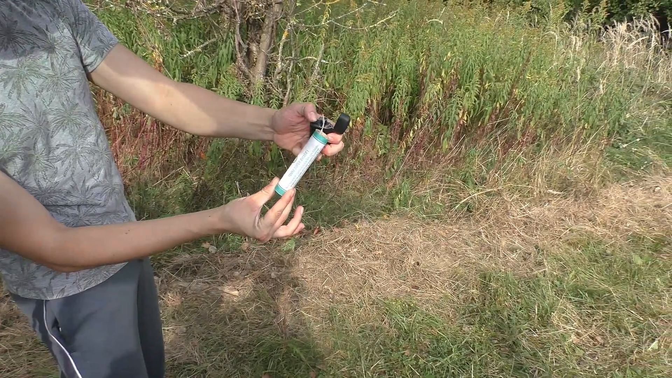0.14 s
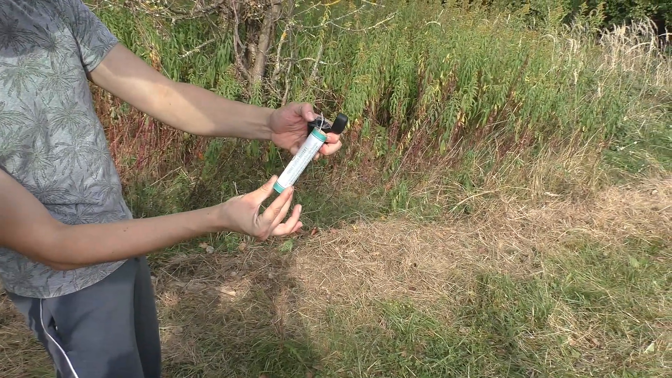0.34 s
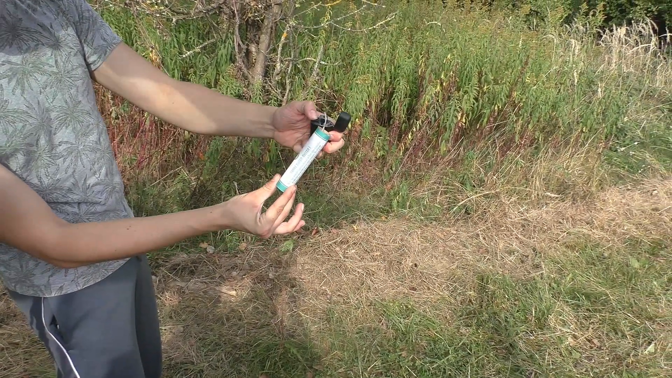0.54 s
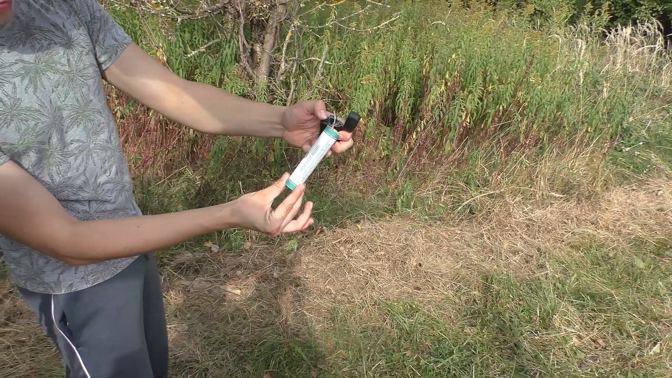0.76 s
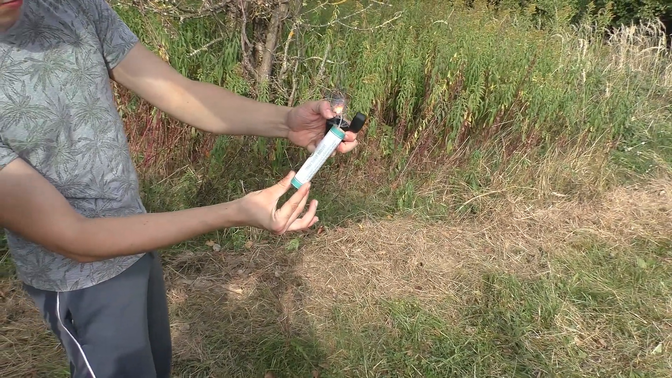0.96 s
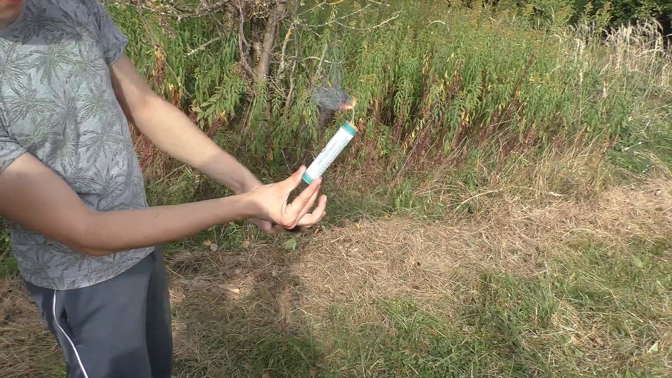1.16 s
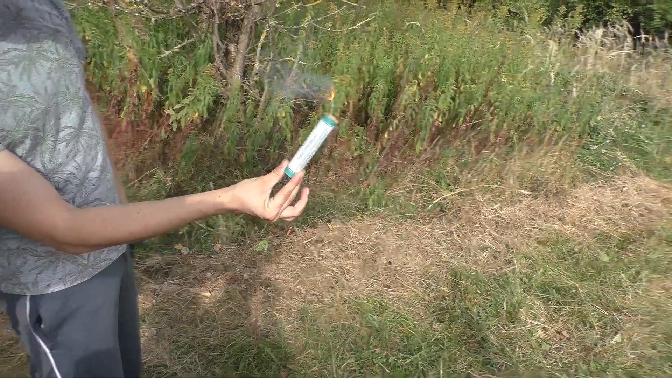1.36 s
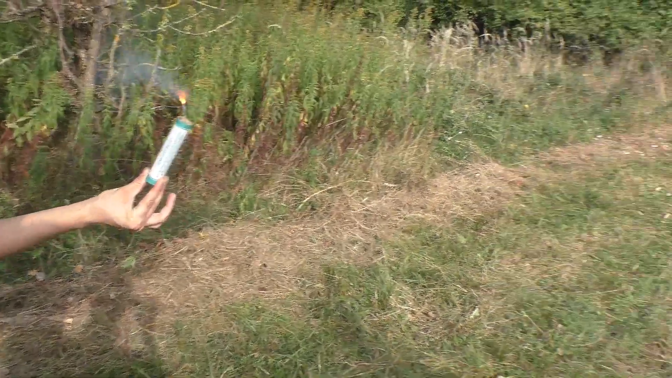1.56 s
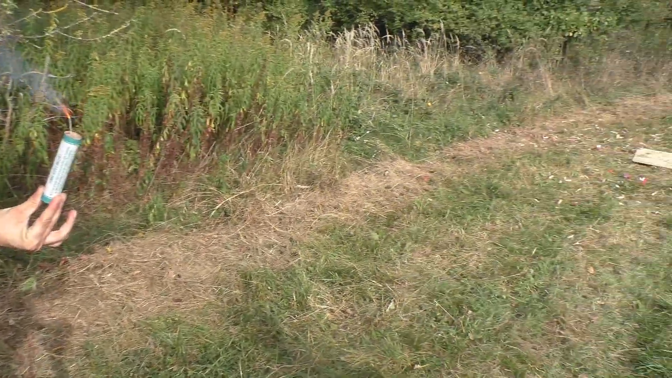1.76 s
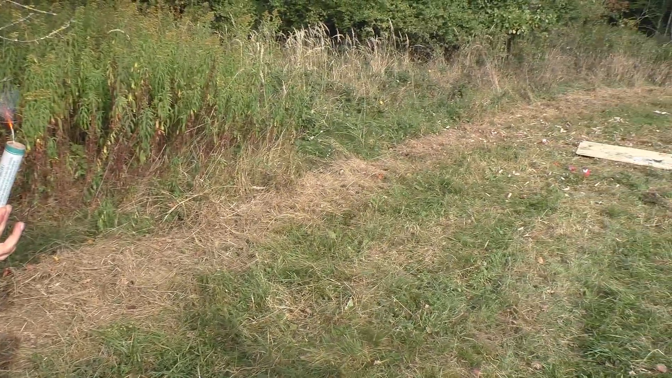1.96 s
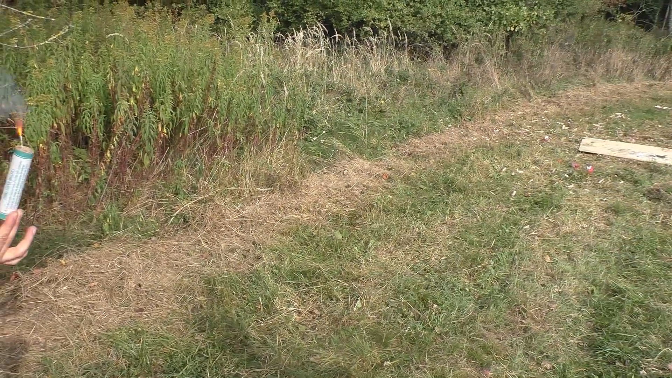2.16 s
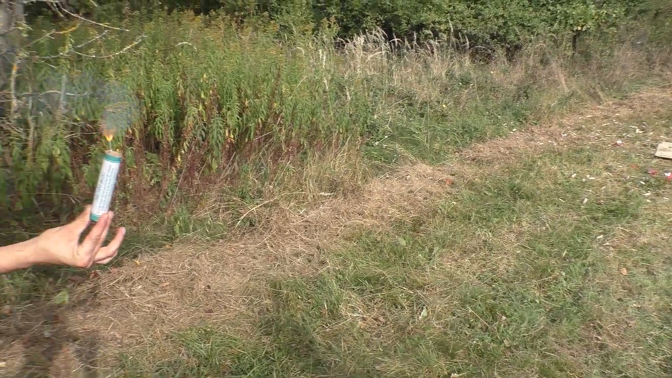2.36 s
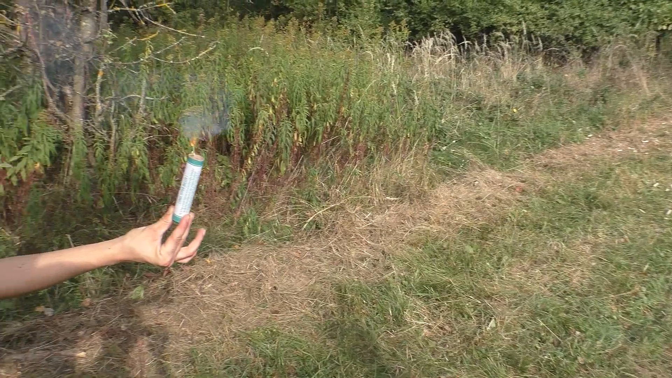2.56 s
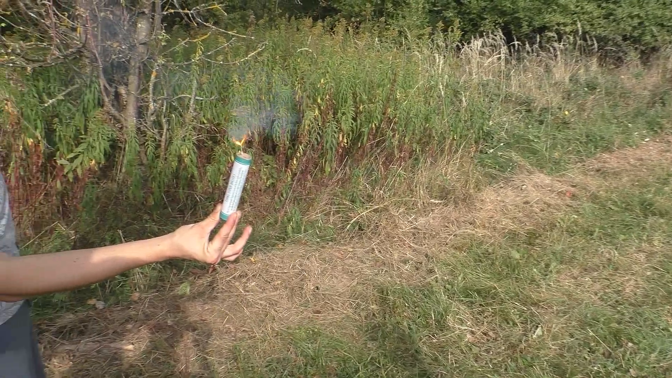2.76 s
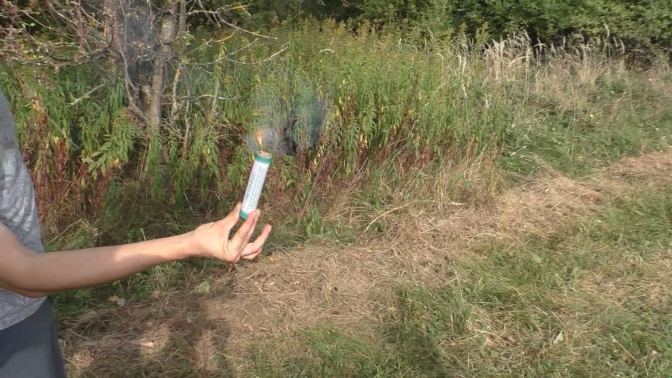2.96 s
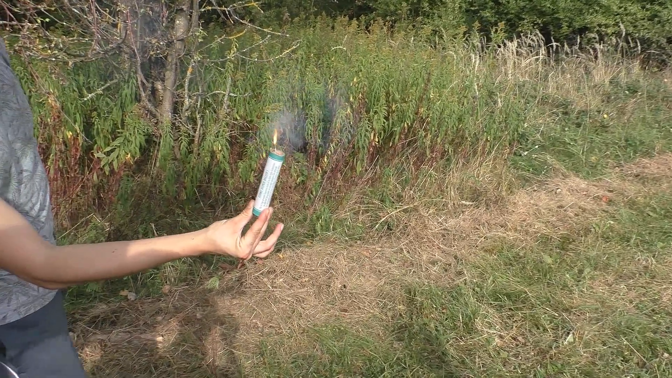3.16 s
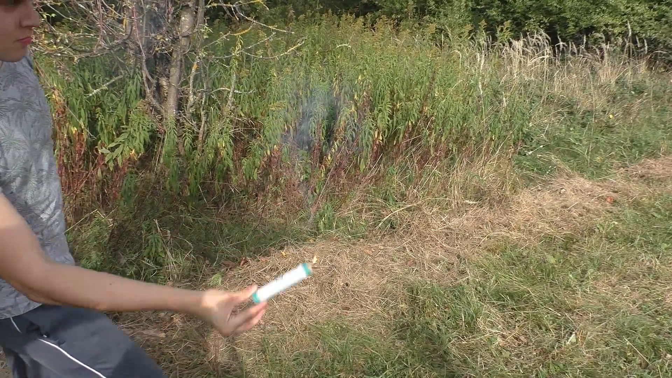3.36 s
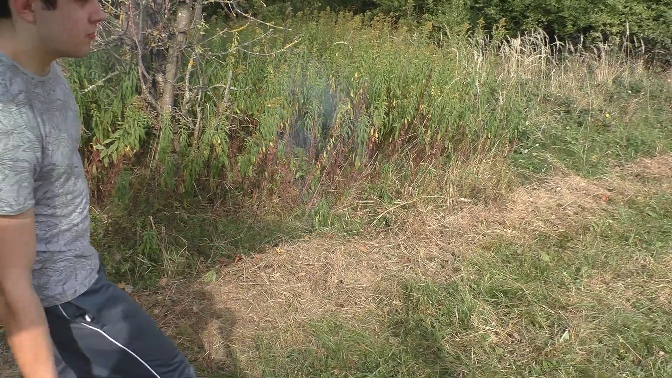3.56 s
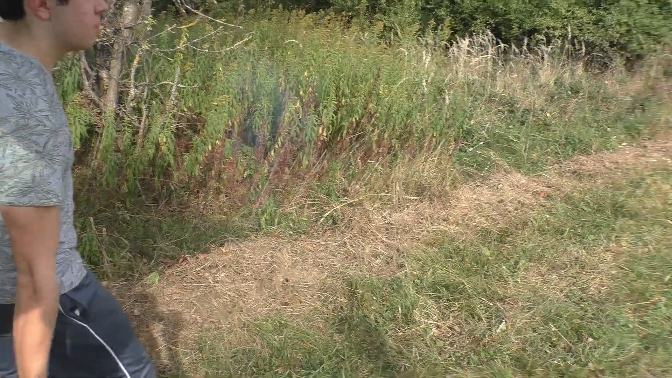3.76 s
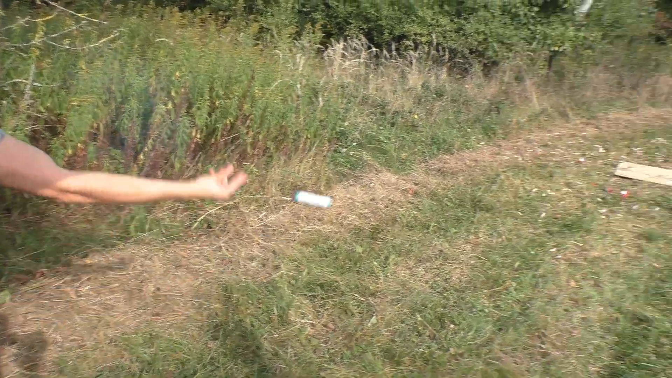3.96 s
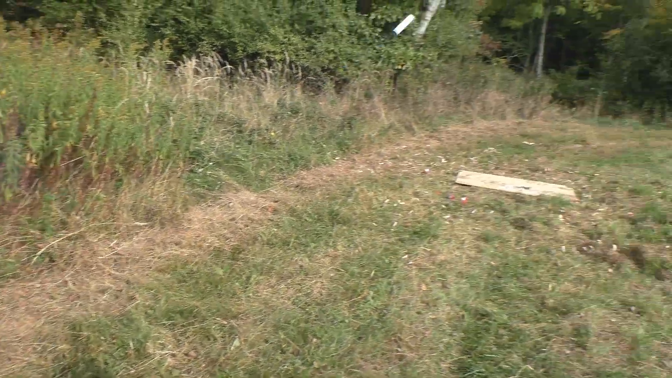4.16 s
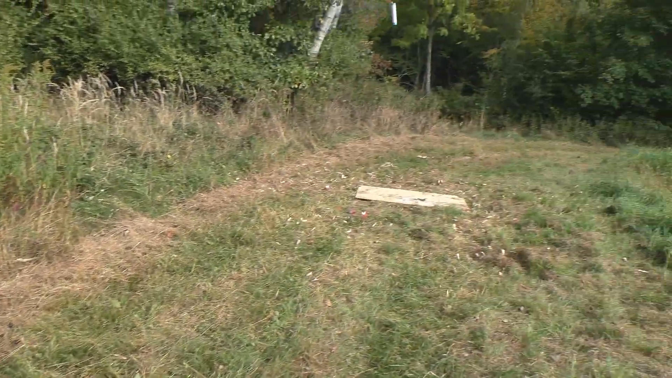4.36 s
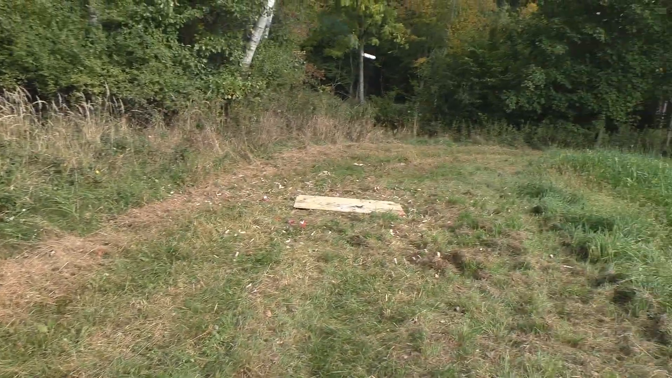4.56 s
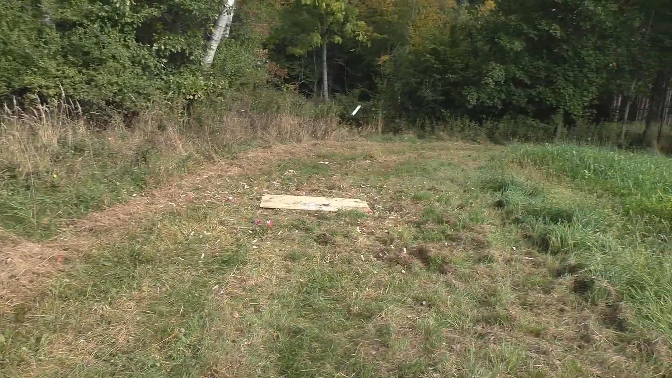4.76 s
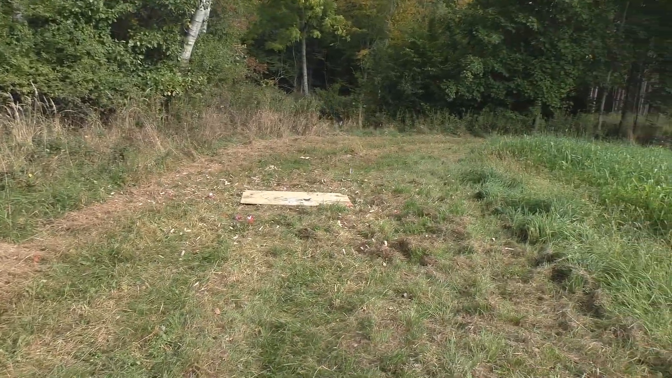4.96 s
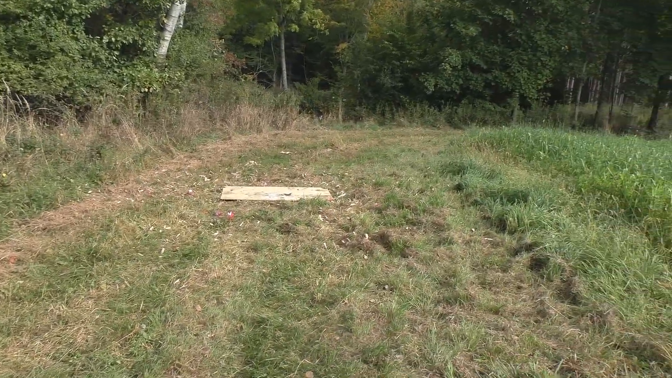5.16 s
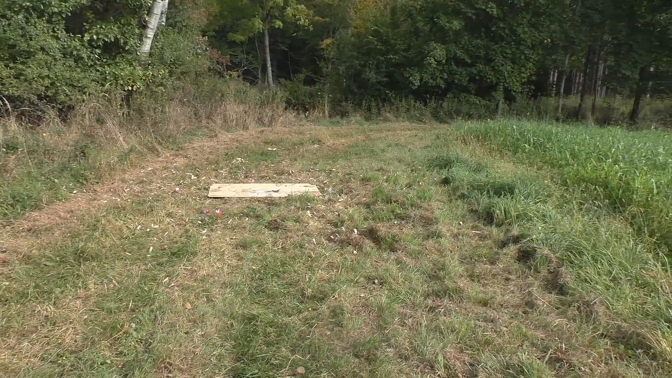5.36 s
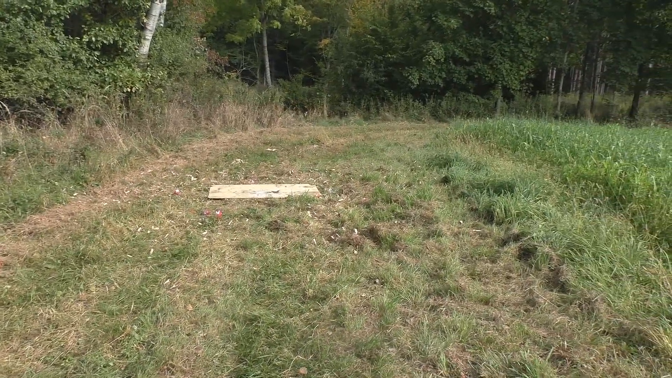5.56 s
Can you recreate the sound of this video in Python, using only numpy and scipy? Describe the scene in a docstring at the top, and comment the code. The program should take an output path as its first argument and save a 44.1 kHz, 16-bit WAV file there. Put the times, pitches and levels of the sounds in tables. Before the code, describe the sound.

A lighter clicks and hisses, a firecracker fuse catches and fizzes, then it is thrown and lands with a dull knock in a field.

```python
"""A jet lighter clicks close to the microphone, over the leaves and far insects of an open field.
Its gas hisses until a firecracker's fuse catches. The jet of burning powder roars and fizzes in the
hand, is swung back with a swish of sleeve and thrown, and fades while short echoes sweep its hiss.
A step crackles in dry grass, and the tube lands farther off with a dull knock and a last brief fizz."""
import sys
import numpy as np
from scipy.fft import rfft, irfft
from scipy.io import wavfile
from scipy.ndimage import map_coordinates

SR = 44100
rng = np.random.default_rng(int(sys.argv[2]) if len(sys.argv) > 2 else 0)


def inscribe(sig):
    """Save sig as 16-bit PCM at rate SR to the path in sys.argv[1].

    A 1-D sig is mono; a 2-D sig holds one channel per row.
    Samples are clipped to [-1, 1] before scaling.
    """
    pcm = np.round(np.clip(np.atleast_2d(sig).T, -1, 1) * 32767)
    wavfile.write(sys.argv[1], SR, pcm.astype(np.int16))


N = 247702
TIME, BINS = np.arange(N) / SR, np.fft.rfftfreq(N, 1 / SR)


def amp(db):
    """Decibels to gain."""
    return 10 ** (np.asarray(db) / 20)


def unit(x):
    """Scales to rms 1."""
    return x / np.sqrt(np.mean(x ** 2) + 1e-20)


def curve(rows, column=1):
    """One column of a table, joined by straight lines in time."""
    rows = np.array(rows)
    return np.interp(TIME, rows[:, 0], rows[:, column])


def colour(points):
    """Gain at every frequency from a short spectrum."""
    hz, db = np.transpose(points)
    return amp(np.interp(np.log(BINS + 1), np.log(hz), db))


def below(hz, order=8):
    """Low-pass gain."""
    return 1 / np.sqrt(1 + (BINS / hz) ** (2 * order))


def above(hz, order=8):
    """High-pass gain."""
    return np.sqrt(1 - below(hz, order=order) ** 2)


def noise(gain, spread):
    """Stereo noise of rms 1; spread is the ratio of side to mid."""
    mid, side = rng.standard_normal((2, N))
    return unit(irfft(rfft([mid + spread * side, mid - spread * side]) * gain, N))


def waver(hz):
    """Random drift of rms 1, mostly slower than hz."""
    return unit(irfft(rfft(rng.standard_normal(N)) * below(hz, order=2), N))


def pan(db):
    """Channel gains that put left db above right."""
    return amp(np.array([[.5], [-.5]]) * db)


def ramp(s, length):
    """Rises from 0 to 1, starting at s."""
    return np.clip((TIME - s) / length, 0, 1)


def arch(s, length):
    """Swells and sinks once, starting at s."""
    return np.sin(np.pi * ramp(s, length))


def burst(s, t60, rise):
    """Envelope that rises at s and dies away."""
    age = np.maximum(TIME - s, 0)
    return (1 - np.exp(-age / rise)) * np.exp(-np.log(1000) * np.minimum(age / t60, 10))


def ring(s, modes, rise=0.00002):
    """Damped modes struck at s; a soft blow has a long rise."""
    age = np.arange(SR // 2) / SR
    sound = sum(amp(db) * np.exp(-np.log(1000) * age / t60) * np.sin(2 * np.pi * hz * age)
                for hz, db, t60 in modes)
    attack = 1 - np.exp(-age / rise)
    return np.pad(sound * attack, (round(s * SR), N))[:N]


def delayed(x, ms):
    """The sound arriving later by a moving lag."""
    at = np.arange(N) - ms * SR / 1000
    return np.array([map_coordinates(channel, [at], order=3) for channel in x])


# Trigger near the microphone, pressed sharply, let go softly:
# t/s, snap/dB, case/dB, thump/dB, snap low-pass f/Hz
CLICKS = [(0.047, 2.5, -18, -17, 19000), (1.118, -16, -24.5, -50, 7500)]
# Modes of the striker, the case and the hand around it: f/Hz, level/dB, t60/s
SNAP_MODES = [(1810, -57, 0.032), (3390, -8, 0.0052), (5360, -13, 0.0075), (7200, -18, 0.0067),
              (8740, -7.5, 0.0065), (9140, -19, 0.01), (11200, -7.5, .005), (12430, 0, 0.0027),
              (14950, -8.5, 0.0022)]
CASE_MODES = [(1590, -25, 0.15), (2330, -3.5, 0.018)]
HAND_MODES = [(100, -21, .02), (245, 3.5, 0.0097), (400, -19.5, 0.014)]

def trigger():
    """The trigger slides, the piezo striker snaps, the case rings and the hand takes a thump."""
    slide = noise(above(9800, order=4) * below(7900, order=4), spread=0.14)
    out = slide * amp(-49.5) * (TIME < CLICKS[0][0])
    scatter_shape = colour([(300, -36), (1000, -40), (2300, 3.5), (4500, -15.5), (9000, -7), (15000, -13)])
    scatter = amp(-24.5) * noise(scatter_shape, spread=0.41)
    for s, snap_db, case_db, thump_db, edge_hz in CLICKS:
        snap = ring(s, SNAP_MODES) + scatter * burst(s, t60=0.056, rise=0.00046)
        out += amp(snap_db) * irfft(rfft(snap) * below(edge_hz, order=2), N)
        out += amp(case_db) * ring(s, CASE_MODES)
        out += amp(thump_db) * ring(s + 0.001, HAND_MODES)
    return out * pan(1.0)


# The open field, all around the microphone: f/Hz, level/dB
FIELD_SPECTRUM = [(50, -57), (130, 2), (260, 6), (420, -4), (650, -9.5), (1200, -1.5), (2700, -3.5),
                  (5200, -9.5), (5700, -15.5), (8500, -19.5), (11000, -11.5), (13500, -16.5), (15500, -20)]

def field():
    """Leaves and far insects blend into a faint, wide hiss."""
    return noise(colour(FIELD_SPECTRUM), spread=0.49) * amp(-55 + .5 * waver(15))


# Stronger puffs of air, right on the microphone: t/s, level/dB, t60/s
PUFFS = [(0.599, -34.5, .08), (.675, -46, 0.073), (.732, -48, 0.097), (.795, -45, .1), (3.89, -49, 0.41),
         (4.28, -51.5, 0.14)]

def wind():
    """Light air rumbles on the microphone."""
    breeze = amp(-63.5 + 3 * waver(6.2))
    puffs = sum(amp(db) * burst(s, t60, rise=0.0032) for s, db, t60 in PUFFS)
    rumble = noise(above(45, order=1) * below(113, order=3), spread=1.0)
    return rumble * (breeze + puffs) * pan(-1.3)


# A small surface close by, as it reflects: f/Hz, level/dB, phase lead/degrees
SURFACE = [(200, 0, 0), (900, .7, 25), (2000, 1, 32), (4200, 0, 36), (6200, -3, 15), (8700, -4.5, 6),
           (11200, -3, -8), (14000, -2.5, 0)]
# Its echo at the microphone as the fuse moves: t/s, lag/ms
SURFACE_LAG = [(1.15, .878), (1.4, .847), (1.7, .778), (2.4, .783), (2.7, .81), (3.27, .813), (3.4, .94),
               (3.6, 1.33), (3.95, 1.24), (4.13, .5)]

def surface_echo(direct):
    """A moving reflection combs the hiss; the surface is small, so it returns little bass."""
    hz, db, lead = np.transpose(SURFACE)
    phase = np.radians(np.interp(BINS, hz, lead))
    response = amp(np.interp(BINS, hz, db)) * np.exp(1j * phase) * above(625, order=2)
    reflected = irfft(rfft(direct) * response, N)
    on_lighter, held_out, swung_back = 0.36, 0.61, 0.41  # echo strength in each position
    strength = on_lighter + (held_out - on_lighter) * ramp(CATCH_S, JET_RISE_S)
    strength += (swung_back - held_out) * ramp(3.3, .25)
    strength *= 1 - ramp(4.12, LEAVE_S)  # lost just after the throw
    return strength * delayed(reflected, curve(SURFACE_LAG))


# The lighter's flame, close and near the centre: f/Hz, level/dB
FLAME_SPECTRUM = [(100, -16), (400, -9.5), (820, -24.5), (1060, 0.5), (1600, 4.5), (2000, 0), (2600, 4),
                  (3000, -14.5), (3900, -2), (5800, -4.5), (7600, -19), (10200, -12), (15500, -15.5)]

def flame():
    """Gas rushes through the lighter's burner while the trigger is held."""
    pressed, let_go = CLICKS[0][0], CLICKS[1][0]
    gas = ramp(pressed + 0.01, 0.12) * (1 - ramp(let_go, 0.052))
    level_db = -39.5 - 4 * ramp(0.37, .25) + 0.85 * waver(38)  # sinks when laid on the fuse
    return noise(colour(FLAME_SPECTRUM), spread=.14) * gas * amp(level_db) * pan(0.99)


CATCH_S, JET_RISE_S = 0.858, 0.31
# The tip of the fuse catching, close up: f/Hz, level/dB
FLARE_SPECTRUM = [(900, -2), (1150, 6), (2600, 7.5), (3100, -5.5), (4300, 4), (6000, 3), (7600, -2),
                  (9800, 0.5), (12000, 6), (15500, -13)]

def flare():
    """The powder catches with a bright hiss."""
    envelope = ramp(CATCH_S, 0.07) * (1 - ramp(CATCH_S + 0.25, 0.2))
    return noise(colour(FLARE_SPECTRUM) * above(990), spread=0.096) * amp(-37) * envelope


THROW_S, LEAVE_S, FADE_S, FADE_DB_PER_S = 4.006, 0.073, 4.73, 43
# The burning fuse at arm's length: f/Hz, level/dB
FUSE_SPECTRUM = [(60, -24.5), (170, -7.5), (380, -6), (560, -12.5), (820, -1.5), (1050, -0.5), (1600, -3.5),
                 (2700, -3), (4000, -10.5), (5500, -12.5), (7500, -6), (10300, -0.5), (13000, -8),
                 (15500, -12.5)]
# Turned, swung and thrown away from the microphone: t/s, base level/dB, fizz lift/dB
BURN = [(1.2, -41.5, -1), (1.45, -40.5, -4), (1.48, -37.5, -2), (1.6, -41.5, 6), (1.84, -42.5, 3),
        (2.2, -41, 3.5), (2.46, -42.5, 5), (3.05, -39.5, 2), (3.08, -41, 4), (3.4, -41.5, 3.5),
        (3.45, -44, 3.5), (3.55, -40, -2.5), (3.61, -44.5, 1), (3.83, -47.5, -1.5), (3.91, -45.5, -1),
        (4.15, -48, -5), (4.55, -51, -6.5)]
# Its place in front of the microphone: t/s, left-right of the fizz/dB
FUSE_PLACE = [(1.25, -0.5), (1.5, 1), (1.95, 3.5), (2.6, 1.3), (3.45, -0.5), (3.8, 4), (4.15, -0.8)]
# Surges in the low roar: t/s, length/s, lift/dB
SURGES = [(1.48, 0.25, 3), (2.1, 0.35, 3.5), (2.876, 0.31, 4), (3.868, 0.14, 0)]
# The top band flashes as the fuse points at the microphone: t/s, length/s, lift/dB
FLASHES = [(1.235, 0.36, 7.5), (1.85, .7, 1.5), (3.28, 0.25, 1)]

def fuse():
    """A turbulent jet of burning powder: roar, rush, hiss and fizz, fading as it flies off."""
    shape, base_db, lift_db = colour(FUSE_SPECTRUM), curve(BURN), curve(BURN, column=2)
    away = ramp(THROW_S, LEAVE_S)
    surge_db = sum(db * arch(s, length) for s, length, db in SURGES)
    flash_db = sum(db * arch(s, length) for s, length, db in FLASHES)
    roar = noise(shape * below(530, order=5), spread=0.24)  # spreads evenly, wherever the fuse points
    roar *= amp(-48.5 + surge_db - 8 * away + 1.37 * waver(26))
    rush = noise(shape * above(1075) * below(4600), spread=0.28) * amp(base_db - 4 + 0.55 * waver(42))
    hiss = noise(shape * above(3460) * below(6970), spread=0.037) * amp(base_db - 5 - 4 * away)
    fizz = noise(shape * above(7230) * below(10530), spread=0.014)
    top = noise(shape * above(11500), spread=0.4) * amp(flash_db + 0.5 * away)
    fizz = (fizz + top) * amp(base_db + lift_db - 3)
    side_db = curve(FUSE_PLACE)
    jet = roar + rush * pan(1.83 * side_db) + hiss * pan(1.2 * side_db) + fizz * pan(side_db)
    distance_gain = amp(-FADE_DB_PER_S * np.maximum(TIME - FADE_S, 0))
    return jet * ramp(CATCH_S, JET_RISE_S) * distance_gain


# Echo off the lighter, centimetres from the fuse: t/s, lag/ms, share of the direct sound
LIGHTER_ECHO = [(1.03, .2, .55), (1.09, .255, .5), (1.13, .36, .35), (1.2, .6, 0)]

def lighter_echo(direct):
    """The fresh spark reflects off the lighter, later and weaker as that is drawn away."""
    return curve(LIGHTER_ECHO, column=2) * delayed(direct, curve(LIGHTER_ECHO))


# Rustle of sleeve and dry grass around the microphone: f/Hz, level/dB
RUSTLE_SPECTRUM = [(200, -14), (700, -13.5), (1250, -2.5), (2500, -6), (3500, -14), (7000, -10),
                   (11000, -15), (15500, -24)]

def rustle_texture():
    """Dense, uneven crackle of rubbing cloth and breaking stalks; returns its body and its treble."""
    shape = colour(RUSTLE_SPECTRUM)
    body = noise(shape * below(4140), spread=0.38)
    treble = noise(shape * above(2400), spread=0.15) * amp(0.5)
    crackle = unit(amp(3.8 * waver(400)))
    return body * crackle, treble * crackle


# Soft rustles nearby, a sleeve a little right, then feet on the left:
# t/s, length/s, level/dB, left-right/dB
RUSTLES = [(3.47, 0.18, -58, -2), (3.88, 0.067, -58, -2), (4.568, 0.25, -48.5, 7), (4.872, 0.082, -57, 7)]
# Single tufts snapping, mostly to the left: t/s, level/dB, t60/s, treble lift/dB, left-right/dB
STALKS = [(3.552, -51.5, 0.091, 17, 3), (3.626, -35, 0.039, -12, 6), (4.6724, -42, 0.072, -15, 7),
          (4.7148, -48, 0.086, -16, 15), (4.7698, -52, 0.051, 2, 8), (4.799, -48, 0.14, -7.5, 4),
          (5.343, -49, 0.021, 4, -3)]

def rustles(body, treble):
    """A sleeve swishes during the swing, then feet press dry grass; single tufts snap."""
    out = np.zeros((2, N))
    clumps = unit(amp(3 * waver(50)))
    for s, length, db, side_db in RUSTLES:
        out += amp(db) * arch(s, length) * clumps * (body + amp(-7) * treble) * pan(side_db)
    for s, db, t60, treble_db, side_db in STALKS:
        out += amp(db) * burst(s, t60, rise=0.00086) * (body + amp(treble_db) * treble) * pan(side_db)
    return out


# Echo off the ground under the flying fuse: t/s, lag/ms, share of the direct sound
GROUND_ECHO = [(4.1, 5.2, 0), (4.3, 5.1, .3), (4.45, 4.65, .3), (4.6, 4.0, .25), (4.8, 3.2, 0)]

def ground_echo(direct):
    """The lag of the ground reflection shrinks in flight, sweeping a comb through the hiss."""
    return curve(GROUND_ECHO, column=2) * delayed(direct, curve(GROUND_ECHO))


# The tube hits the turf and topples, a throw away from the microphone: t/s, level/dB
KNOCKS = [(5.174, -22), (5.1831, -31)]
# Modes of that thud: f/Hz, level/dB, t60/s
THUD_MODES = [(133.8, -23, 0.45), (230, 0.5, 0.096), (291, 9, 0.043), (375, -12.5, 0.18)]

def landing(body, treble):
    """The tube cuts through grass and thuds on turf; a dull tail returns from the edge of the wood."""
    hit_s = KNOCKS[0][0]
    touch_s = hit_s - .0105
    brush = amp(-31) * burst(touch_s, t60=0.046, rise=0.0044)
    settle = amp(-56.5) * burst(touch_s, t60=0.78, rise=.003)
    grass = (brush + settle) * (body + amp(-3) * treble)
    thud = sum(amp(db) * ring(s, THUD_MODES, rise=0.0047) for s, db in KNOCKS)
    tail = noise(above(110, order=3) * below(330, order=4), spread=0.17)
    return grass + thud + amp(-30) * tail * burst(hit_s, t60=0.19, rise=0.0084)


def last_fizz():
    """The fuse fizzes briefly where it lies, far from the microphone."""
    shape = colour(FUSE_SPECTRUM) * above(8900, order=4) * below(12500)
    return noise(shape, spread=0.14) * amp(-60) * arch(5.25, .16)


def scene():
    """Everything that reaches the microphone, from the hand out to the open field."""
    jet = fuse()
    sputter = amp(.5 * waver(20) + 0.72 * waver(530))  # shared by all the burning powder
    powder = (jet + last_fizz() + flare()) * sputter
    direct = trigger() + flame() + powder + lighter_echo(powder)
    echoes = surface_echo(direct) + ground_echo(direct)
    texture = rustle_texture()
    return direct + echoes + rustles(*texture) + landing(*texture) + field() + wind()


def record(dry):
    """The microphone chain: overload on the sharpest peak, a bass cut and a steep band limit."""
    clipped = np.clip(dry, -.85, .85)
    band = above(45, order=1) * below(15850, order=120)
    return irfft(rfft(clipped) * band, N)


dry = scene()
out = record(dry)
inscribe(out)
```